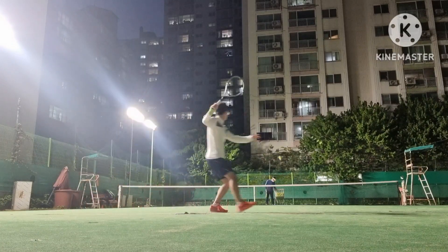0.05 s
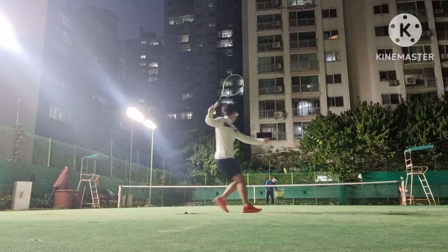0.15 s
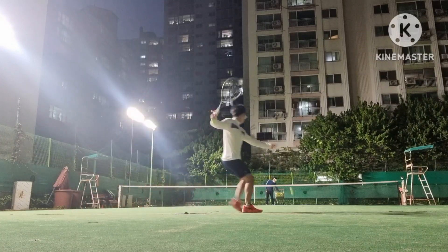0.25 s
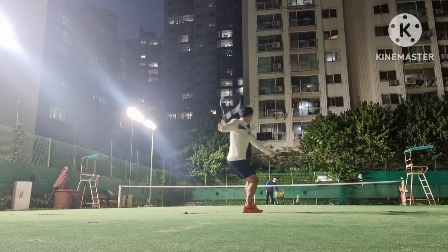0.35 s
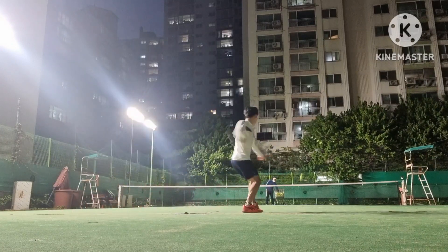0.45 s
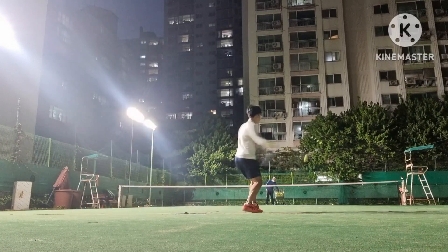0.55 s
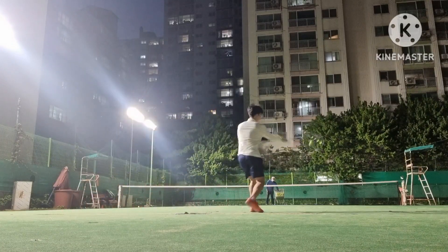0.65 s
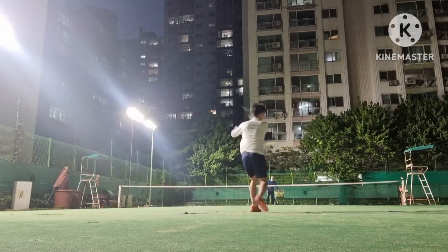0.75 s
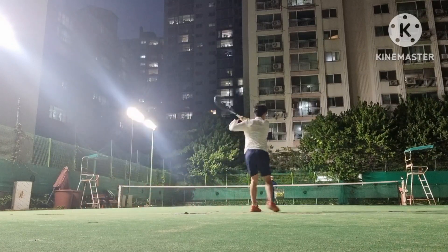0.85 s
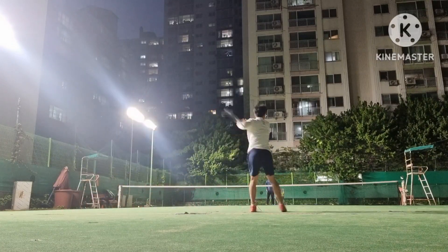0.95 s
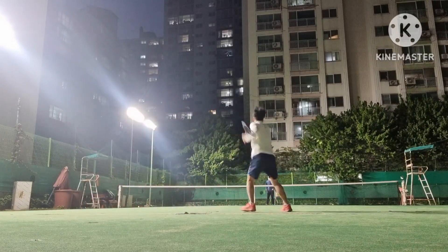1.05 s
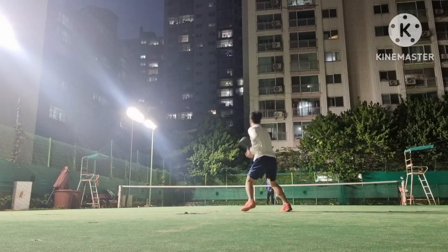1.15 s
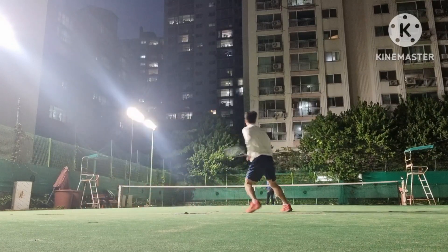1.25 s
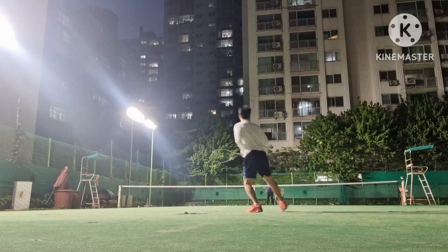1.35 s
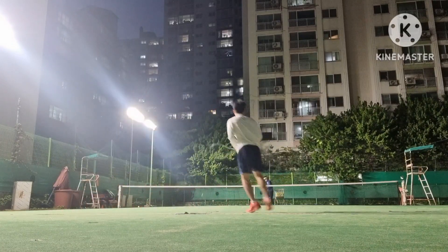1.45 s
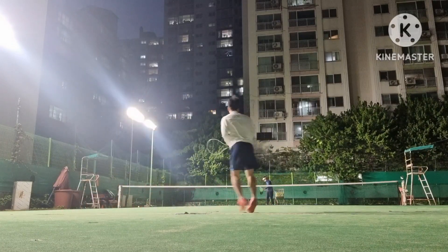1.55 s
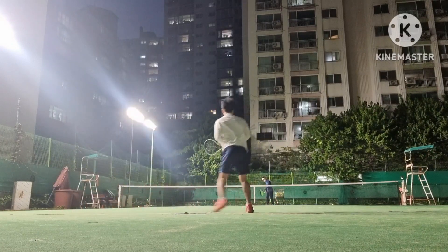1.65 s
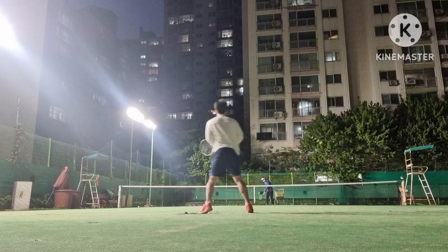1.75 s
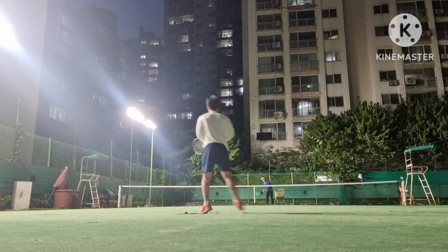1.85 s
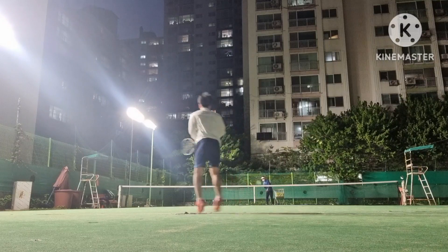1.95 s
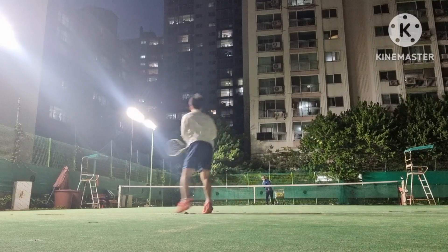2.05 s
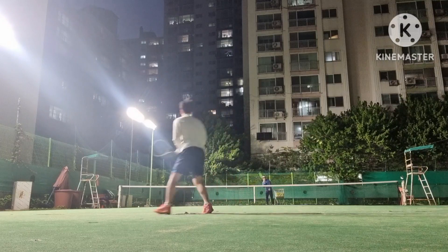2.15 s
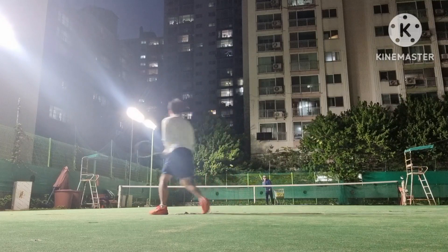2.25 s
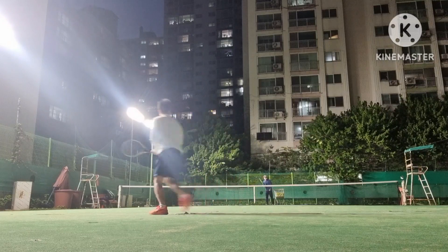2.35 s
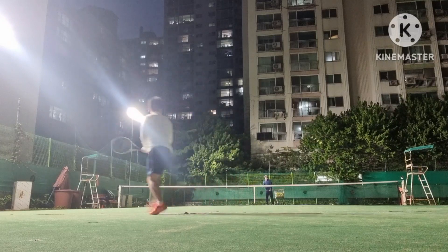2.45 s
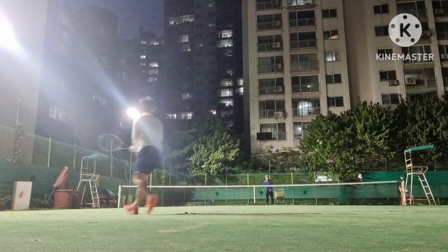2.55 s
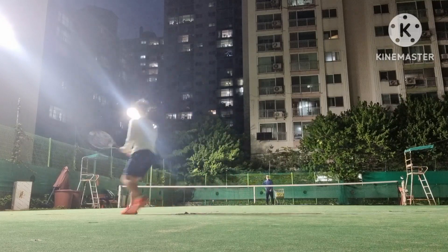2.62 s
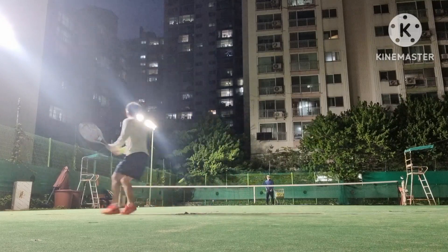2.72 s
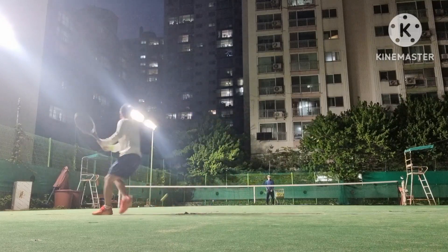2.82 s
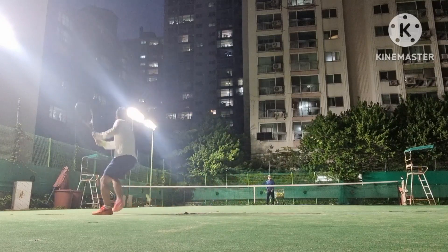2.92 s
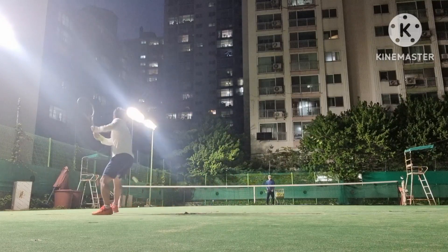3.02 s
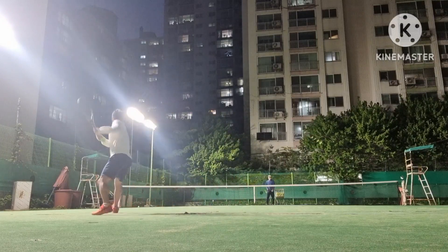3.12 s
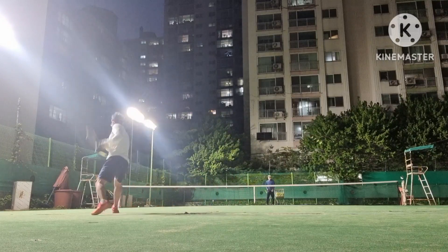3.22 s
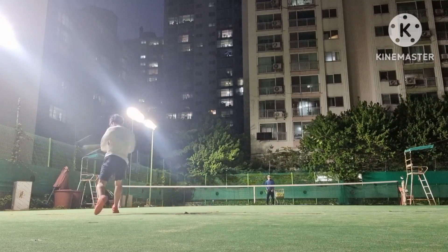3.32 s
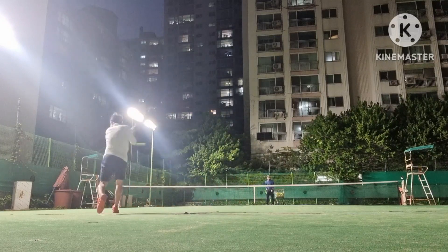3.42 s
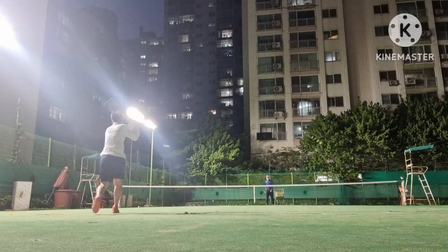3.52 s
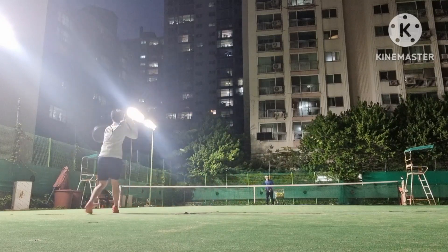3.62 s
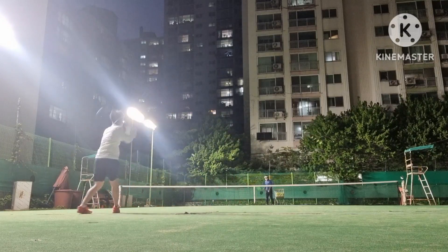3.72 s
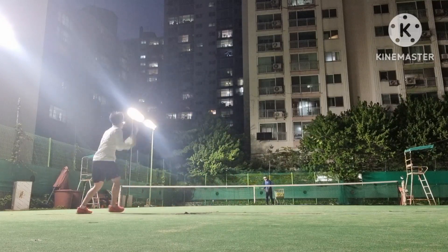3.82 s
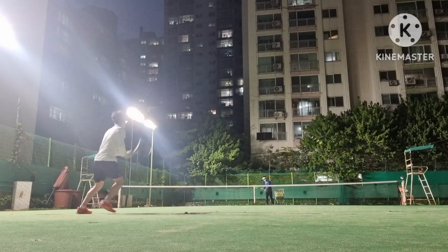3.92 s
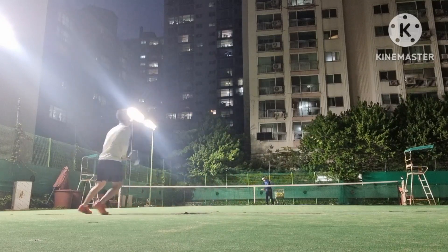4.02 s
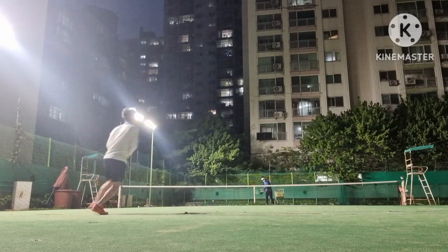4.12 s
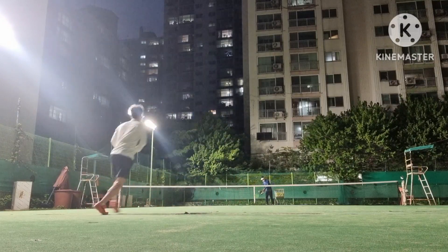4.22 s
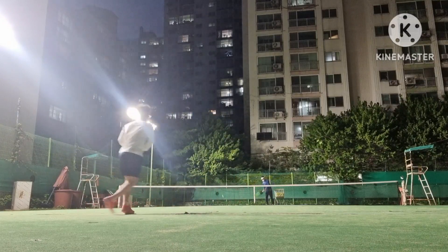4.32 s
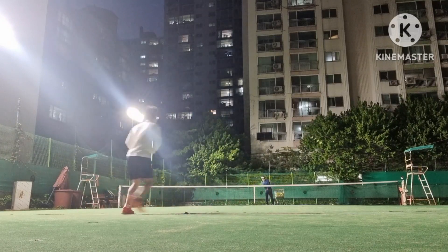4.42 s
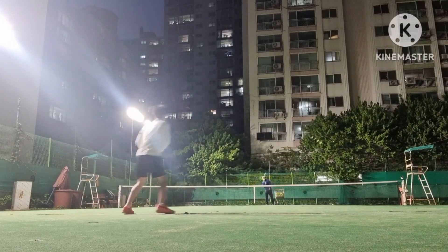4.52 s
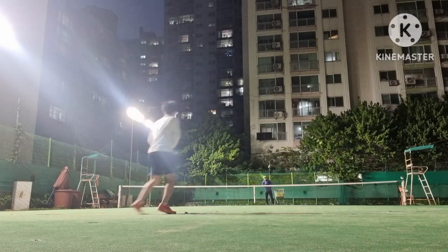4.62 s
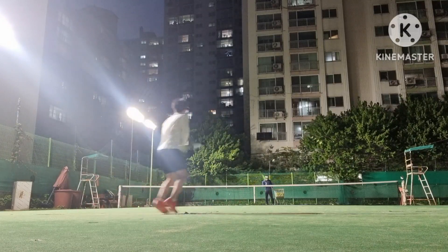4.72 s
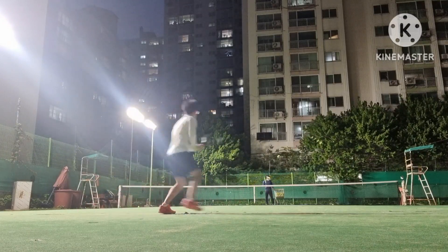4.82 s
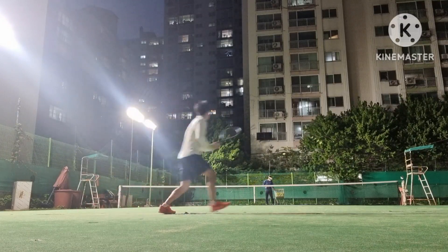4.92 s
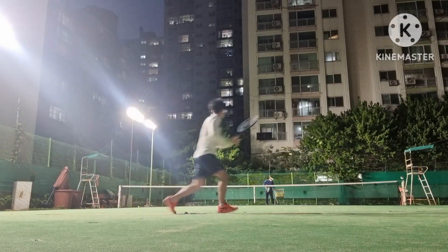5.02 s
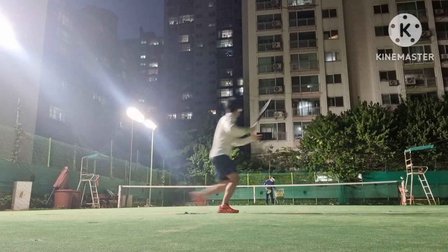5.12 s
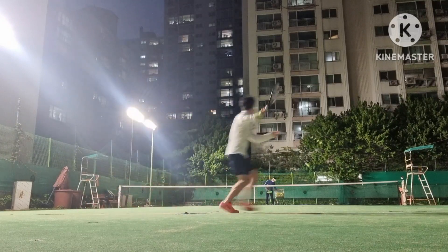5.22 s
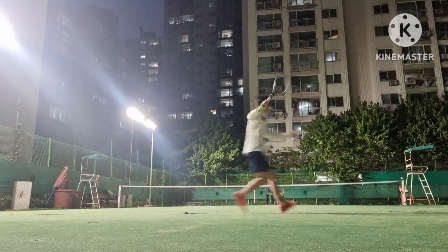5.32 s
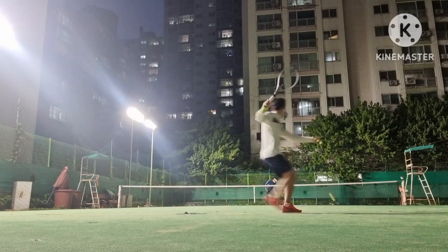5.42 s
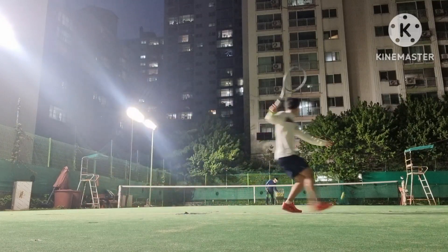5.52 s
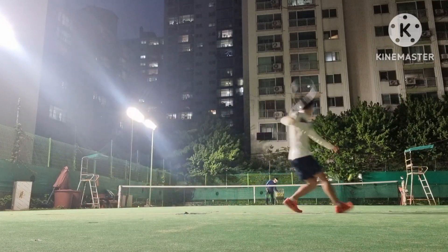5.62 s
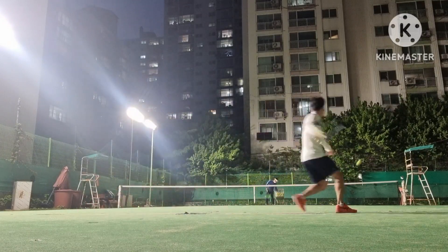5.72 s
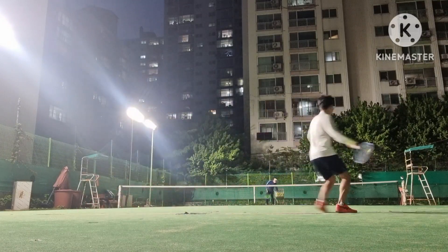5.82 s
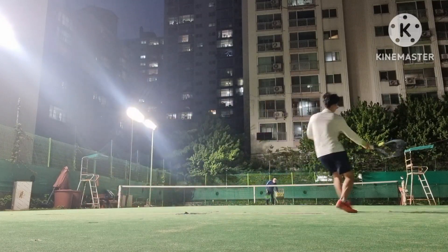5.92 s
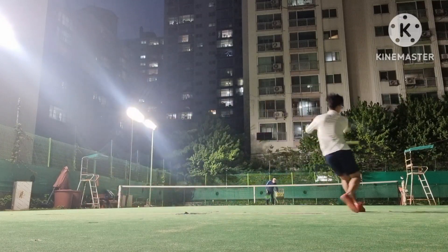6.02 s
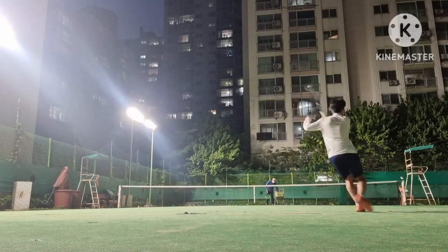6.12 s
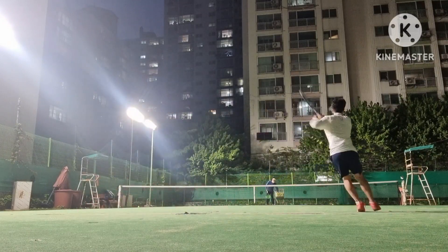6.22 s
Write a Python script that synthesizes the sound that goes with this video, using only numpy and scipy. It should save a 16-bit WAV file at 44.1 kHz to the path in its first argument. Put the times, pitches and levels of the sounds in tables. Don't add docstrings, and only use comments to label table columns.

```python
import sys
import numpy as np
from scipy import signal
from scipy.fft import rfft, irfft, next_fast_len
from scipy.io import wavfile

SR = 44100
rng = np.random.default_rng(int(sys.argv[2]) if len(sys.argv) > 2 else 0)


def dump_mix(stems):
    frames = np.atleast_2d(stems).T
    limited = np.clip(frames, -1, 1)
    pcm = np.round(limited * 32767).astype(np.int16)
    wavfile.write(sys.argv[1], SR, pcm)


def natural_amplitude(level_db):
    exponent = np.asarray(level_db, float) / 20
    return 10 ** exponent


N = 276066
TIME = np.arange(N) / SR

# start in seconds, peak in dB, ball contact in seconds, string crack in dB, shell in dB.
BLOWS = [
    (0.801, -5.5, 0.0024, -7.5, -3.5),
    (3.4478, -13.5, 0.0046, -10.5, -4),
    (6.1054, -6.5, 0.00295, -4, -5),
]
# time in seconds, lag of left port in samples.
PLAYER = [(0, 0), (.45, -2), (.8, -4), (1.35, -2), (1.84, 1), (2.14, 1), (2.7, 5), (3.45, 7), (4.1, 7),
          (4.64, 3.5), (4.9, 3), (5.6, -4), (6.1, -8.5), (6.3, -9)]


def rms_one(x):
    return x / np.sqrt(np.mean(x ** 2) + 1e-20)


def peak_one(x):
    return x / np.abs(x).max()


def at_hz(points, hz):
    points_hz, points_db = np.transpose(points)
    return np.interp(np.log(hz), np.log(points_hz), points_db)


def coloured(x, points):
    size = next_fast_len(x.shape[-1])
    hz = np.fft.rfftfreq(size, 1 / SR) + 1
    octaves_below = np.maximum(np.log2(points[0][0] / hz), 0)
    octaves_above = np.maximum(np.log2(hz / points[-1][0]), 0)
    gain = natural_amplitude(at_hz(points, hz) - 24 * (octaves_below + octaves_above))
    return irfft(rfft(x, size) * gain, size)[..., :x.shape[-1]]


def drift(rate_hz):
    r = np.exp(-80 * np.pi * rate_hz / SR)
    noise = rng.standard_normal(N // 40 + 2002)
    slow = signal.lfilter([1], [1, -2 * r, r * r], noise)[2000:]
    return np.interp(np.arange(N) / 40, np.arange(len(slow)), rms_one(slow))


def swell(t, s, level_db, rise_db_per_s, held_s, fall_db_per_s):
    rise_db = rise_db_per_s * np.maximum(s - t, 0)
    fall_db = fall_db_per_s * np.maximum(t - s - held_s, 0)
    return level_db - rise_db - fall_db


def ring(x, hz, width_hz):
    r, w = np.exp(-np.pi * width_hz / SR), 2 * np.pi * hz / SR
    return signal.lfilter([0, np.sin(w)], [1, -2 * r * np.cos(w), r * r], x)


def hollow(x, hz, width_hz):
    return peak_one(ring(ring(x, hz, width_hz), hz, 0.43 * width_hz))


def thin_bass(x):
    return signal.sosfiltfilt(signal.butter(2, 202, "high", fs=SR, output="sos"), x)


def add(track, sound, s):
    i = round(s * SR)
    track[..., i:i + sound.shape[-1]] += sound[..., :N - i]


def ports(left, right):
    half_lag = np.interp(TIME, *np.transpose(PLAYER)) / 2
    i = np.arange(N)
    return np.array([np.interp(i - half_lag, i, left), np.interp(i + half_lag, i, right)])


def facets():
    # delay in seconds, level in dB, rise in dB/s, fall in dB/s.
    scatter = [
        (0.014, -26, 801, 240.5),
        (0.202, -36.5, 201, 30.5),
    ]
    after = np.arange(SR) / SR
    tail = sum(natural_amplitude(swell(after, s, db, rise, 0, fall) - 23.5) for s, db, rise, fall in scatter)
    facet_gain = natural_amplitude(2.2 * rng.standard_normal(SR // 300 + 1)).repeat(300)[:SR]
    mid, side = rng.standard_normal((2, SR)) * facet_gain
    side = signal.lfilter(*signal.butter(1, 900, "high", fs=SR), side)
    return (mid + side * [[1], [-1]]) * tail


def blow(stay_s, crack_db, smear_db, shell_db, rings):
    # frequency in Hz, density in dB per Hz.
    crack = [(1200, -2), (1650, -11), (2500, -6), (3500, 2.5), (5000, -5), (9000, -12), (12000, -18.5),
             (15500, -8.5)]
    shell_hz, shell_width_hz = 1085, 270
    t = np.arange(round(.2 * SR)) / SR - .02
    contact = np.exp(-.5 * ((t - .0011) / .00025) ** 2)
    release = np.exp(-.5 * ((t - stay_s) / .00016) ** 2)
    shared, *own = rng.standard_normal((3, len(t)))
    onset = np.where(t < 0, 0.074 * np.exp(np.minimum(t, 0) / 0.0047), 1)
    fading = onset * np.minimum(1, np.exp(-t / 0.0056))
    lingering = 0.049 * (t > 0) * np.exp(-t / 0.025) * np.array(own)
    burst = (shared + 0.42 * np.array(own)) * fading
    ball, strings = np.zeros(len(t)), 0
    for hz, width_hz, level_db in [*rings, (shell_hz, shell_width_hz, shell_db)]:
        height = natural_amplitude(level_db) * width_hz / 200
        if hz < 550:
            ball += height * peak_one(ring(contact, hz, width_hz))
            smear = np.cos(2 * np.pi * hz * (t - .0017)) * np.exp(-np.abs(t) / 0.0097) * (t < .001)
            ball += natural_amplitude(smear_db) * height * smear
        elif hz < 1400:
            sign = -1 if hz == shell_hz else 1
            ball += sign * height * hollow(release, hz, 1.046 * width_hz)
        else:
            strings = strings + height * peak_one(ring(burst, hz, width_hz + 100))
    crackle = peak_one(coloured(burst + lingering, crack))
    return peak_one(thin_bass(ball) + strings) + natural_amplitude(crack_db) * crackle


def racquet():
    # frequency in Hz, width in Hz, level in dB.
    blow_rings = [
        [(380, 440, 6.5), (880, 380, -2), (2040, 33, -19), (2730, 140, -17), (3270, 130, 3.5), (4220, 300, -12)],
        [(294, 460, 7.5), (824, 330, 0), (2130, 110, -48.5), (3360, 130, -17), (3880, 110, -23),
         (4690, 120, -7), (5370, 260, -10.5)],
        [(258, 340, 9), (802, 207, 4.5), (2490, 330, -11), (3320, 110, 2), (3550, 120, -5), (3860, 110, 3)],
    ]
    # frequency in Hz, density in dB per Hz.
    facades = [(170, -1.5), (300, -0.5), (600, -3), (850, -8), (1100, -0.5), (1400, 2.5), (2200, -9.5),
               (6000, -20)]
    # delay after blow in seconds, level in dB.
    walls = [
        (0.07, -29),
        (0.171, -46),
        (0.192, -22),
        (.238, -43),
        (0.428, -51),
    ]
    near_fence_db, far_fence_db, fence_crack_db = -20.5, -33, -3
    mid_court_s, s_per_lag = .0377, -.00087
    across_court_s = .157
    near, far = np.zeros((2, N)), np.zeros((2, N))
    after = np.arange(400) / SR
    for (s, peak_db, stay_s, crack_db, shell_db), rings in zip(BLOWS, blow_rings):
        sound = blow(stay_s, crack_db, -24, shell_db, rings)
        fence_s = mid_court_s + s_per_lag * np.interp(s, *np.transpose(PLAYER))
        fences = [(fence_s, near_fence_db), (across_court_s - fence_s, far_fence_db)]
        add(near, natural_amplitude(peak_db) * sound, s - .02)
        back = peak_one(coloured(sound, facades))
        for echo_s, echo_db in [*fences, *walls]:
            rough_wall = rng.standard_normal(400) * np.exp(-after / 0.0012)
            echo = peak_one(signal.fftconvolve(back, rough_wall[None], axes=1))
            add(far, natural_amplitude(peak_db + echo_db - 8) * echo, min(s + echo_s - .02, TIME[-1]))
        add(near, natural_amplitude(peak_db + near_fence_db + fence_crack_db) * sound, s + fence_s - .02)
        add(far, natural_amplitude(peak_db) * signal.fftconvolve(facets(), back, axes=1), s - .02)
    return ports(*near) + far


def bounces():
    # start in seconds, peak in dB, thud in Hz, pop in Hz, pop in dB.
    hits = [
        (0.457, -38, 247, 840, -9),
        (1.772, -49.5, 220, 880, -3),
        (1.999, -48, 220, 802, -3),
        (2.448, -52, 203, 864, -6),
        (3.011, -41.5, 258, 1200, 1.5),
        (4.482, -51.5, 234, 824, -3),
        (5.603, -40, 250, 1230, 0),
    ]
    scatter_db, scatter_hz = -32.5, 770
    out, t = np.zeros(N), np.arange(round(.06 * SR)) / SR
    for s, peak_db, thud_hz, pop_hz, pop_db in hits:
        thud = peak_one(ring(np.exp(-.5 * ((t - .003) / 0.00035) ** 2), thud_hz, 87))
        tap = np.exp(-.5 * ((t - .0012) / 0.00004) ** 2)
        pop = hollow(tap + 0.45 * np.roll(tap, round(0.0066 * SR)), pop_hz, 340)
        felt = rng.standard_normal(len(t)) * np.exp(-t / 0.012)
        pop += 0.2 * hollow(felt, 2500, 2400)
        add(out, natural_amplitude(peak_db + 10.5) * thud + natural_amplitude(peak_db + pop_db) * pop, s - .0003)
    out = thin_bass(out)
    court = natural_amplitude(scatter_db) * ring(ring(out, scatter_hz, 300), scatter_hz, 300)[None]
    return ports(out, out) + signal.fftconvolve(facets(), court, axes=1)[:, :N]


def grains(per_s, uneven_db):
    sizes = natural_amplitude(uneven_db * np.minimum(rng.exponential(1, (3, N)), 5)) * rng.choice([-1, 1], (3, N))
    both, left, right = sizes * (rng.random((3, N)) < per_s * natural_amplitude(3.0 * drift(45)) / SR)
    return np.array([both + 0.61 * left, both + 1.06 * right]) + 1e-18


def ringing_patch(x, centre_hz, spread_octaves, patchy_db):
    # frequency in Hz, level in dB.
    port_ring = [(1500, 0), (2500, -3), (3300, 0), (4200, -9.5), (5300, -3.5), (6500, -14)]
    out = 0
    for hz in np.geomspace(1500, 6500, 16):
        near_centre = 1 / (1 + (np.log2(hz / centre_hz) / spread_octaves) ** 2)
        gain = near_centre * natural_amplitude(patchy_db * drift(9.2) + at_hz(port_ring, hz))
        out = out + gain * rms_one(ring(x, hz, 0.019 * hz))
    return rms_one(out)


def shoes():
    # full from in seconds, held in seconds, grit in dB, sole in dB, grit in Hz.
    slides = [
        (.407, 0.011, -53.5, -22, 2670),
        (.445, 0.028, -55.5, 3.5, 2360),
        (.5, 0.033, -70, -2, 2670),
        (.995, 0.075, -68.5, 12.5, 1550),
        (1.04, 0.063, -62.5, -14, 2540),
        (1.105, 0.033, -54.5, -24, 2500),
        (1.328, 0.046, -61, 1, 3400),
        (5.8, 0.13, -79.5, 5.5, 2550),
        (5.72, 0.029, -65.5, 5.5, 2660),
    ]
    skids = [
        (3.765, 0.056, -55, -13, 3097),
        (3.85, .07, -83, -1, 2080),
        (5.922, 0.02, -60, -21, 4830),
        (5.96, 0.071, -80, -11, 2700),
    ]
    # start in seconds, grit peak in dB, sole in dB, grit in Hz, t60 in seconds.
    landings = [(0.0393, -47.5, 8, 3270, 0.011), (0.211, -62, -2, 2640, 0.092),
                (1.6764, -58.5, 13, 2750, 0.079), (1.8317, -42, -9.5, 3242, 0.071),
                (1.8674, -63.5, -6, 2980, 0.14), (2.132, -57, 7, 2400, 0.042),
                (2.2936, -65, 11, 2800, 0.11), (2.6683, -55.5, -1, 2540, 0.097),
                (2.8763, -57.5, 7.5, 2010, 0.092), (2.9382, -70, 6, 5390, 0.072),
                (3.7374, -51.5, -7, 2080, 0.01), (4.114, -53.5, -5, 2670, 0.093),
                (4.164, -65.5, 4, 4830, 0.088), (4.395, -58.5, 14.5, 2040, 0.1),
                (4.6228, -44, -9, 3700, 0.12), (4.6444, -57, 17, 3400, 0.056),
                (4.7506, -53, -17, 2850, 0.06), (4.7894, -70.5, -2, 5000, 0.3),
                (4.8613, -49, -2, 2600, 0.11)]
    shuffles = [
        (1.472, -67, 12, 1783, 0.032),
        (1.584, -64.5, 6, 2810, 0.16),
        (1.716, -57, -13, 3250, 0.08),
        (2.0729, -60, -11, 1870, 0.024),
        (2.17, -53.5, -4.5, 3320, 0.1),
        (2.338, -61.5, -7, 3330, 0.13),
        (2.9044, -59, 3, 1780, 0.072),
        (5.0569, -70.5, -13.5, 2730, 0.27),
        (5.433, -53.5, -3.5, 3130, 0.091),
    ]
    # frequency in Hz, density in dB per Hz.
    grit_colour = [(940, -78), (1600, -17.5), (2590, -7), (3230, 0.5), (3510, -18), (3790, -3), (4160, -17),
                   (6500, -31.5), (8450, -68), (14300, -120)]
    sole_colour = [(600, 8.5), (850, 15), (1100, 15.5), (1450, -3), (1800, -2)]
    hiss_colour = [(5200, 12), (6800, 2.5), (9000, -1), (13000, -8), (15500, 0.5)]
    drag_colour = [(2350, -19), (4000, -5.5), (5280, 4.5), (6700, -13), (11000, -12), (11600, -10),
                   (15500, -9)]
    # full from in seconds, level in dB, rise in dB/s, held in seconds, fall in dB/s.
    toe_drag = [
        (3.05, -69, 141, 0.05, 34),
    ]
    # frequency in Hz, width in Hz, level in dB.
    drag_rings = [(4370, 36, 0), (5230, 130, -21), (7490, 46, -14), (9300, 21, -22), (10400, 32, -3),
                  (11700, 75, -6), (13800, 170, -16), (15400, 43, -20)]
    press_db_per_s, lift_db_per_s = 1800, 424
    slide_hiss_db, skid_hiss_db, landing_hiss_db, shuffle_hiss_db = -19, -5.5, -11.5, -30
    settling = np.array([[1], [1], [1.08]])

    press, grit_hz = np.zeros((3, N)), np.full(N, 3000.)
    t = np.arange(round(.3 * SR)) / SR
    for rows, hiss_db in [(slides, slide_hiss_db), (skids, skid_hiss_db)]:
        for s, held_s, grit_db, sole_db, hz in rows:
            shape = natural_amplitude(swell(t - .05, 0, grit_db, press_db_per_s, held_s, lift_db_per_s))
            add(press, natural_amplitude(np.array([[0], [sole_db], [hiss_db]])) * shape, s - .05)
            grit_hz[(TIME > s - .02) & (TIME < s + held_s + .08)] = hz
    for rows, hiss_db in [(landings, landing_hiss_db), (shuffles, shuffle_hiss_db)]:
        for s, grit_db, sole_db, hz, t60_s in rows:
            shape = np.minimum(t / 0.0057, 1) * natural_amplitude(-60 * np.maximum(t / t60_s - .22, 0))
            shape += 0.79 * np.minimum(t / 0.0004, 1) * np.exp(-t / 0.0035)
            levels_db = grit_db - 11.0 + np.array([[0], [sole_db], [hiss_db + 11.5]])
            add(press, natural_amplitude(levels_db) * shape ** settling, s)
            grit_hz[(TIME > s) & (TIME < s + .6 * t60_s)] = hz

    sand = grains(per_s=4000.0, uneven_db=4.2)
    grit = 0.65 * rms_one(coloured(sand, grit_colour))
    grit = grit + 1.14 * ringing_patch(sand, grit_hz, spread_octaves=0.63, patchy_db=5.0)
    crunch = press[0] * grit
    crunch = crunch + press[1] * rms_one(coloured(sand, sole_colour))
    crunch = crunch + press[2] * rms_one(coloured(sand, hiss_colour))
    drag = sum(natural_amplitude(level_db) * np.sqrt(width_hz) * rms_one(ring(sand, hz, width_hz))
               for hz, width_hz, level_db in drag_rings)
    drag = 0.71 * rms_one(drag) + rms_one(coloured(sand, drag_colour))
    drag_gain = natural_amplitude(swell(TIME, *toe_drag[0])) * (TIME < 3.45)
    return ports(*(crunch + drag_gain * drag))


def snaps():
    # start in seconds, peak in dB, ring in Hz, crackle in dB.
    pebbles = [(0.0393, -60, 3210, -24), (0.4072, -63, 2280, -11), (.741, -101, 3200, -17),
               (1.8038, -46.5, 3000, 4.5), (2.1326, -65, 2570, 7), (2.1705, -57, 3100, -8),
               (2.4468, -59, 1900, -11), (3.7367, -54, 1900, -3), (4.6894, -57, 1880, -15),
               (5.0578, -65, 4500, -18), (5.9204, -50, 5530, -8)]
    out, t = np.zeros(N), np.arange(round(.02 * SR)) / SR
    for s, peak_db, hz, crackle_db in pebbles:
        crackle = np.diff(rng.standard_normal(len(t) + 1)) * np.exp(-t / 0.0061)
        sound = natural_amplitude(crackle_db) * peak_one(crackle) + 0.76 * peak_one(ring(crackle, hz, 500))
        add(out, natural_amplitude(peak_db) * sound, s)
    return ports(out, out)


def swings():
    # fastest at in seconds, whistle in dB, rise in dB/s, fall in dB/s, whistle in Hz.
    strokes = [
        (.667, -54.5, 405, 147, 3250),
        (.8, -52.5, 97.5, 3003, 3662),
        (3.447, -58.5, 497, 3002, 3700),
        (6.104, -55, 396.5, 3008, 3700),
    ]
    # frequency in Hz, density in dB per Hz.
    swish = [(5000, -6.5), (6500, -6), (7600, 1.5), (10500, -8), (11800, -8.5), (13500, -1), (15500, -2.5)]
    glide_hz_per_s, octaves = 2200, .3
    peak_hiss_db, hiss_lag_db_per_s = -7.5, 121
    air = rng.standard_normal(N) + .5 * rng.standard_normal((2, N))
    hiss, out = rms_one(coloured(air, swish)), np.zeros((2, N))
    low_cut = signal.butter(4, 2400, "high", fs=SR, output="sos")
    for s, whistle_db, rise, fall, top_hz in strokes:
        span = np.abs(TIME - s) < .2
        t = TIME[span]
        hz = top_hz + glide_hz_per_s * (t - s)
        to_blow_s = min(b[0] for b in BLOWS if b[0] > s - .01) - t
        whistle = 0
        for band_hz in np.arange(2500, 5000, 200):
            weight = np.exp(-(np.log2(band_hz / hz) / octaves) ** 2)
            whistle = whistle + weight * rms_one(ring(ring(air[:, span], band_hz, 300), band_hz, 300))
        whistle = rms_one(signal.sosfilt(low_cut, whistle))
        hiss_db = peak_hiss_db - hiss_lag_db_per_s * np.maximum(to_blow_s, 0)
        gain = natural_amplitude(swell(t, s, whistle_db, rise, 0, fall))
        out[:, span] += gain * (whistle + natural_amplitude(hiss_db) * hiss[:, span])
    return ports(*out)


def town():
    # frequency in Hz, density in dB per Hz.
    hum = [(15, -36), (25, -8.5), (70, 1), (145, -7), (285, -8.5), (531, -15), (962, -27.5), (1130, -25.5),
           (1440, -31), (3250, -37), (4250, -56), (5280, -50.5), (6920, -58), (14800, -60.5), (16000, -67)]
    # time in seconds, level in dB.
    hum_db = [(0.0, -56.5), (1.03, -55), (1.34, -57.5), (1.9, -55), (2.56, -57.5), (3.59, -54), (4.2, -58),
              (5.0, -57), (5.2, -58), (6.26, -55.5)]
    # frequency in Hz, left-right likeness (0 to 1).
    likeness = [(60, 0.99), (150, 0.94), (380, 0.75), (950, 0.27), (2380, 0.31), (5980, 0.18),
                (15000, 0.05)]
    out, together = 0, drift(2.0)
    edges_hz = 25 * 2 ** np.arange(0, 9.5, 1 / 3)
    white = rng.standard_normal((2, 2, N))
    for k, (low, high) in enumerate(zip(edges_hz, edges_hz[1:])):
        band = signal.butter(2, [low, high], "band", fs=SR, output="sos")
        mid, side = signal.sosfilt(band, white[k % 2])
        hz = np.sqrt(low * high)
        alike = np.clip(at_hz(likeness, hz), 0, 1)
        gain = natural_amplitude(at_hz(hum, hz) + .7 * together + 1.2 * drift(6))
        out = out + gain * (np.sqrt(1 + alike) * mid + np.sqrt(1 - alike) * side * [[1], [-1]])
    return natural_amplitude(np.interp(TIME, *np.transpose(hum_db)) + 0.5) * rms_one(out)


def scene():
    return racquet() + bounces() + shoes() + snaps() + swings() + town()


def low_pass(x):
    return signal.sosfilt(signal.butter(12, 16510, fs=SR, output="sos"), x)


def record(dry):
    left_db, left_treble, cutoff_hz = .9, .15, 16200
    treble = signal.lfilter(*signal.butter(1, 2000, "high", fs=SR), dry)
    ported = (dry + left_treble * treble * [[1], [-1]]) * natural_amplitude([[left_db / 2], [-left_db / 2]])
    top_cut = signal.cheby2(8, 40, cutoff_hz, fs=SR, output="sos")
    return low_pass(signal.sosfilt(top_cut, ported))


dry = scene()
out = record(dry)
dump_mix(out)
```